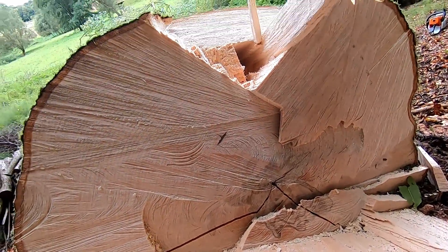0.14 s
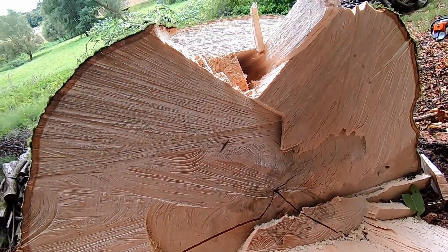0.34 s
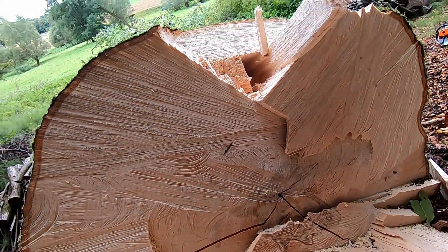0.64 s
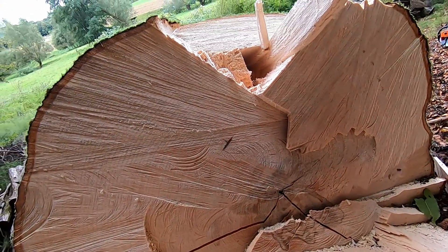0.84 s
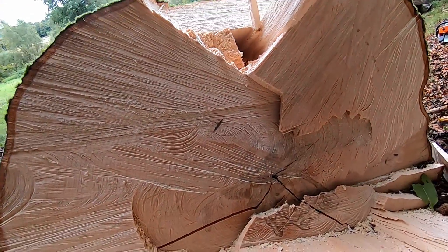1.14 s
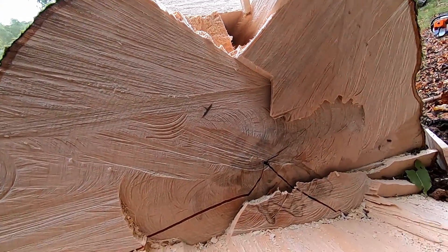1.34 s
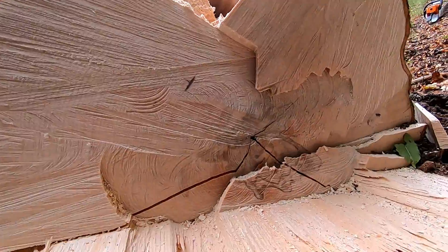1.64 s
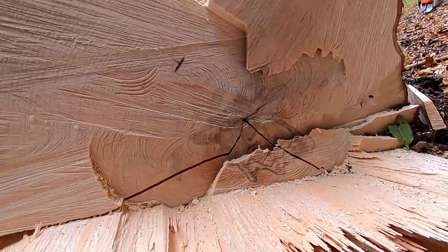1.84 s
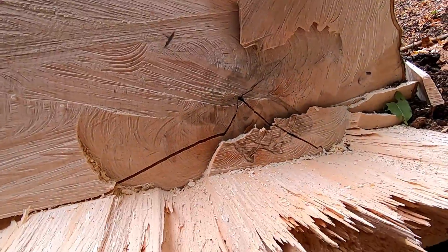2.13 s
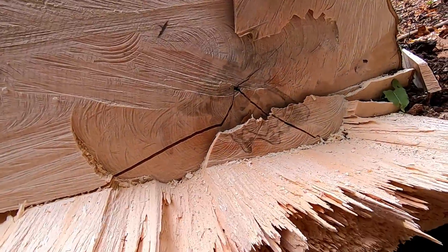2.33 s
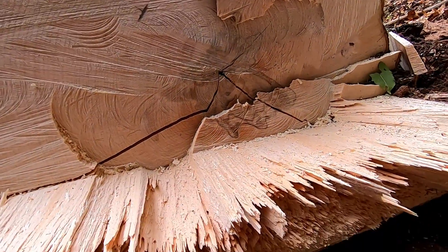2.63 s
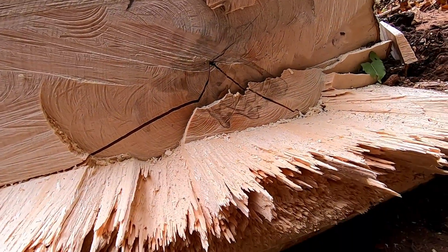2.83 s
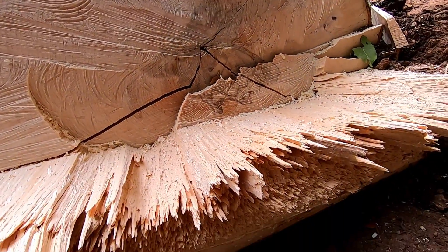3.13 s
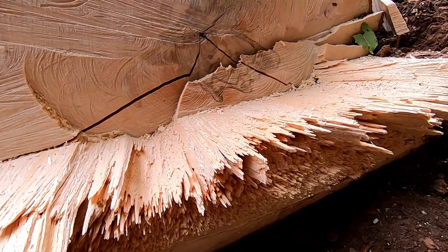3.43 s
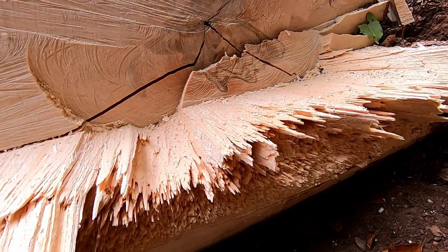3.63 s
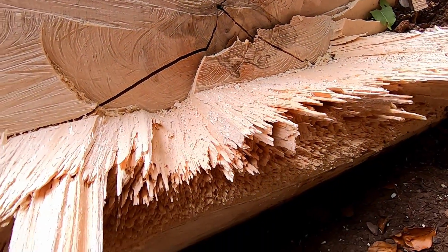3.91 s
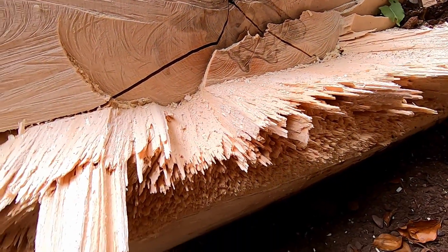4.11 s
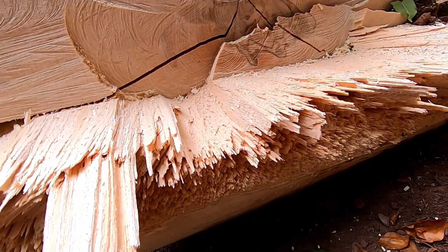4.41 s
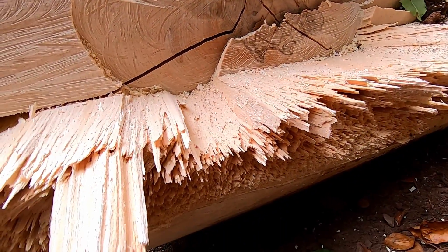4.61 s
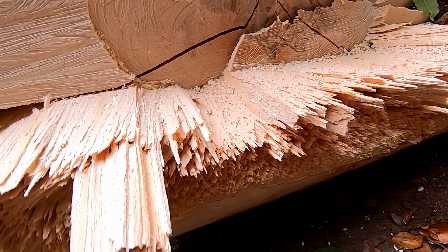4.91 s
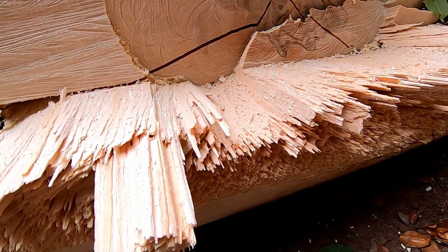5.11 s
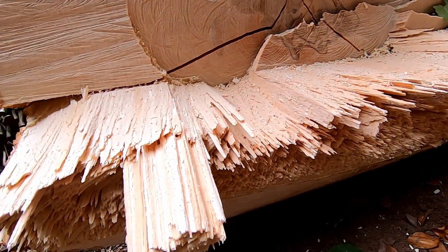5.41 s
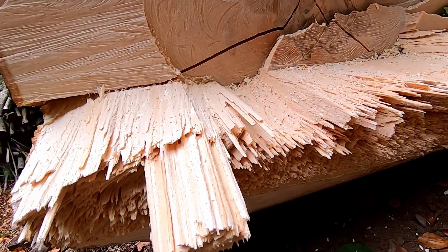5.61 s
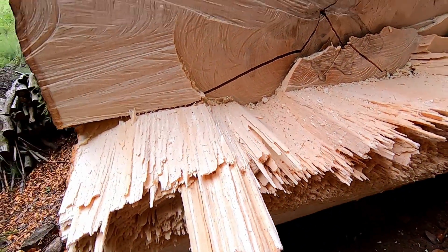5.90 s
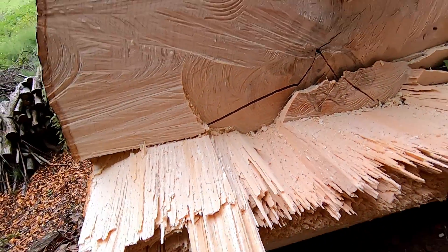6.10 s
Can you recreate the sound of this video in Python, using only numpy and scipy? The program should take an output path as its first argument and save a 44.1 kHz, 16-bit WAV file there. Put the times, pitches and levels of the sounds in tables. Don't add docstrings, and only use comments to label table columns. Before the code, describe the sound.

Five slow, heavy footsteps thump on soft woodland ground beside a felled trunk, each cracking dry litter, over light breeze and faint distant traffic.

```python
import sys
import numpy as np
from scipy import signal
from scipy.fft import rfft, irfft, next_fast_len
from scipy.io import wavfile
from scipy.ndimage import map_coordinates

SR = 44100
rng = np.random.default_rng(int(sys.argv[2]) if len(sys.argv) > 2 else 0)


def how_loud(loudness_db):
    steps = np.asarray(loudness_db, float) / 20
    return 10 ** steps


def materialize(psi):
    bounded = np.clip(np.atleast_2d(psi).T, -1, 1)
    quanta = np.round(bounded * 32767).astype(np.int16)
    wavfile.write(sys.argv[1], SR, quanta)


N = 275660


def on_log(table, hz):
    f, v = np.transpose(table)
    return np.interp(np.log(hz), np.log(f), v)


def stereo(mid, side):
    return np.array([mid + side, mid - side])


def add(out, x, s):
    i = int(s * SR)
    out[:, i:i + x.shape[1]] += x[:, :N - i]


def bands(size, colour, side, pan, gain_db, count=3):
    f = np.arange(size // 2 + 1) * SR / size + 1e-9
    white = rfft(rng.standard_normal((2, size)))
    mid_spec, side_spec = white * how_loud(on_log(colour, f)) * [np.ones(len(f)), how_loud(on_log(side, f))]
    lean = how_loud(np.outer([.5, -.5], on_log(pan, f)))
    unit_rms = size / np.sqrt(2 * np.sum(abs(mid_spec) ** 2))
    spec = stereo(mid_spec, side_spec) * lean * unit_rms
    low_hz, top_hz = colour[0][0], colour[-2][0]
    out = 0
    for octave in np.arange(0, np.log2(top_hz / low_hz) + 1 / count, 1 / count):
        hz = low_hz * 2 ** octave
        window = np.cos(np.pi / 2 * np.clip(count * np.log2(f / hz), -1, 1)) ** 2
        out = out + how_loud(gain_db(hz)) * irfft(spec * window, size)
    return out


def walk(rate, size):
    knots = rng.standard_normal(int(size * rate / SR) + 4)
    return 1.2 * map_coordinates(knots, [np.arange(size) * rate / SR], order=1)


def ring(t, hz, t60, side_db, lead=0.6):
    z = np.exp((2j * np.pi * hz - np.log(1000) / t60) * t)
    return stereo(z.imag, how_loud(side_db) * (z * np.exp(1j * lead)).real)


# [f/Hz, level/dB]
AIR_COLOUR = [(12, -26), (20, -4.5), (66, 0.5), (85, -13.5), (117, -17), (149, -10.5), (170, -16),
              (199, -6.5), (233, -17), (618, -17.5), (894, -19.5), (1400, -18.5), (2640, -24), (7580, -32),
              (10600, -46.5), (11000, -56.5), (14300, -55), (22000, -120)]
# [f/Hz, side level/dB]
AIR_SIDE = [(60, -11.5), (110, -24), (190, -8.5), (340, -10.5), (600, -6.5), (1060, -1.5), (1880, -4),
            (3340, -9), (5930, -4), (10500, 1.5)]
# [f/Hz, left minus right/dB]
AIR_PAN = [(60, -1.5), (110, -1.5), (190, 0.5), (340, -0.5), (600, 1), (1060, 4), (1880, 1), (3340, 1.5),
           (5930, -1), (10500, 2.5)]
# [t/s, level/dB]
LOW_SWELL = [(0.35, -1.5), (0.69, -3.5), (1.04, 4), (1.13, -2.5), (1.95, 0), (2.8, 4.5), (3.83, -4.5), (4.2, 2),
             (6.25, 1)]
# [t/s, level/dB]
TRAFFIC = [(0.35, 3.5), (1.13, 5), (2.3, 2), (3.3, 2), (3.85, 7), (4.2, 3.5), (4.999, -5.5), (6.25, -5)]
AIR_DB = -52.5
UPPER_PER_TRAFFIC = -0.26


def air():
    size = next_fast_len(N)
    t = np.arange(size) / SR
    low_swell_db = np.interp(t, *np.transpose(LOW_SWELL))
    traffic_db = np.interp(t, *np.transpose(TRAFFIC))

    def bump(hz, centre_hz, octaves):
        return np.exp(-(np.log2(hz / centre_hz) / octaves) ** 2)

    def gain_db(hz):
        low, mid, high = bump(hz, 70, 1.77), bump(hz, 600, 1.38), bump(hz, 1500, 1.48)
        swell_db = low * low_swell_db + (mid + UPPER_PER_TRAFFIC * high) * traffic_db
        return swell_db + (.5 + 1.9 * low + 2.7 * mid) * walk(11, size)

    return how_loud(AIR_DB) * bands(size, AIR_COLOUR, AIR_SIDE, AIR_PAN, gain_db, count=2)[:, :N]


# [t/s, low level/dB, mid level/dB, high level/dB, tilt/(dB/octave)]
GRINDS = [
    (0.03, -31.5, -31, -30.5, 3.5),
    (1.466, -29.5, -30.5, -30, 8),
    (2.916, -20.5, -24, -18.5, -4),
    (4.225, -24, -46, -28, -11),
    (5.302, -24, -38.5, -36, 14),
]
# [t/s, level/dB]
SCRAPES = [
    (2.84, -30),
    (2.866, -30),
]
# [low/dB, mid/dB, high/dB, tilt/(dB/octave)]
SOLE_GRIND_DB = (-13, -5.5, -10, 10.5)
# [low/dB, mid/dB, high/dB, tilt/(dB/octave)]
SCRAPE_DB = (-10, 1.5, -15, 26.5)
HEEL_GRIND_MS, SOLE_GRIND_MS, SCRAPE_MS = 27, 13.4, 33.4
SOLE_GRIND_LAG_S = .056


def contacts():
    for s, *heel in GRINDS:
        yield s, *heel, HEEL_GRIND_MS
        yield s + SOLE_GRIND_LAG_S, *np.add(heel, SOLE_GRIND_DB), SOLE_GRIND_MS
    for s, db in SCRAPES:
        yield s, *np.add(SCRAPE_DB[:3], db), SCRAPE_DB[3], SCRAPE_MS


# [f/Hz, level/dB, t60/s, side level/dB]
WOOD = [
    [(248.3, -7, 0.19, -12.5), (316, -2.5, 0.031, -25)],
    [(386.8, -1.5, 0.098, -21)],
    [(533.5, 0, 0.029, -20), (632, -6.5, 0.078, -1.5), (705, -14, 0.087, -6.5), (805, -13, 0.077, 2),
     (947, -17.5, 0.1, -8), (1153, -29, 0.12, -17), (1265, -33.5, 0.13, -10)],
]
SOIL_TOP_HZ = 1150


def grinds(out):
    t = np.arange(SR // 4) / SR
    soil = signal.butter(4, SOIL_TOP_HZ, fs=SR, output="sos")
    for s, *group_dbs, tilt, ms in contacts():
        x = t[:SR // 10] * 1000 / ms
        pressure = (1 - np.exp(-(x / 0.12) ** 2)) * np.exp(-x ** 2.64)
        wood = 0
        for group_db, modes in zip(group_dbs, WOOD):
            for hz, mode_db, t60, side_db in modes:
                force = rng.standard_normal(len(x)) * pressure
                rung = signal.fftconvolve(ring(t, hz, t60, side_db), [force])
                level_db = group_db + mode_db + tilt * max(np.log2(hz / 525), 0)
                wood = wood + how_loud(level_db) * rung / abs(rung).max()
        add(out, how_loud(4.5) * signal.sosfilt(soil, wood), s)


# [t/s, soil level/dB, trunk level/dB, push length/ms, rebound level/dB]
HEELS = [
    (0.034, -12.5, -9.5, 3.37, -16.5),
    (1.472, -11, -18.5, 1.6, -4.5),
    (2.922, -6.5, -9, 2.58, -12),
    (4.231, -11.5, -12, 4.05, 1),
    (5.305, -13.5, -22.5, 2.4, 0),
]
# [lag/s, level/dB, share of rebound/1]
JOLTS = [
    (-.008, -12, 0.2),
    (0, 3.5, 0.26),
    (.010, -1, 1),
    (.015, -12.5, 0.05),
    (.023, -0.5, 0.3),
    (0.034, -15, -.8),
    (.043, -8, 0.2),
    (0.049, -13, 0.7),
    (.085, -14.5, 0),
]
# [f/Hz, level/dB, t60/s, side level/dB]
BODY = [
    [(45, -24, 0.17, -17.5), (78, -2.5, .16, -27), (100, -18.5, 0.069, -35.5)],
    [(137.8, 2.5, 0.082, -30.5), (159.2, 4, 0.12, -23), (176, -7.5, 0.072, -18)],
]
# [f/Hz, level/dB]
RUMBLE = [(15, -39), (25, -2.5), (70, -1.5), (114, 8), (188, 3), (224, -3), (299, -13.5), (379, -0.5),
          (425, -29), (500, -7), (650, -30), (1100, -120)]
# [f/Hz, side level/dB]
RUSTLE_SIDE = [(60, -14), (110, -29.5), (190, -28), (340, -23), (600, -6.5), (1060, -2.5), (1880, -3.5),
               (3340, -10), (5930, -4.5), (10500, 2)]
# [f/Hz, left minus right/dB]
RUSTLE_PAN = [(60, 0), (110, 0), (190, -2.5), (340, 3), (600, 1.5), (1060, 3), (1880, -2), (3340, 0.5),
              (5930, -1), (10500, 3.5)]
SOIL_LOW_HZ = 60
RUMBLE_DB, RUMBLE_T60_S, RUMBLE_LEAD_S = -10.5, 0.46, .004


def heels(out):
    t = np.arange(SR // 2) / SR
    thump_low_cut = signal.butter(2, SOIL_LOW_HZ, "high", fs=SR, output="sos")

    def body(modes):
        rung = sum(how_loud(db) * ring(t, hz, t60, side_db) for hz, db, t60, side_db in modes)
        return signal.sosfilt(thump_low_cut, rung)

    def rumble_db(hz):
        return -60 * t / (RUMBLE_T60_S * (hz / 100) ** -.3)

    soil, trunk = (body(modes) for modes in BODY)
    for s, soil_db, trunk_db, ms, rebound_db in HEELS:
        x = t[:SR // 50] * 1000 / ms
        push = x * np.exp(-2 * x)
        struck = how_loud(soil_db) * soil + how_loud(trunk_db) * trunk
        thud = signal.fftconvolve(struck, [push / push.sum()])
        for lag, jolt_db, share in JOLTS:
            add(out, how_loud(jolt_db + share * rebound_db) * thud, s + lag)
        rumble = bands(len(t), RUMBLE, RUSTLE_SIDE, RUSTLE_PAN, rumble_db)
        onset = 1 - np.exp(-(t / 0.031) ** 2)
        add(out, how_loud(soil_db + RUMBLE_DB) * onset * rumble, s - RUMBLE_LEAD_S)


# [t/s, crack treble level/dB, rustle level/dB, rustle tilt/(dB/octave), twig f/Hz]
SOLES = [
    (0.087, -12.5, -51, -4, 1044),
    (1.525, -4, -39.5, 0, 2890),
    (2.974, -7.5, -40.5, -0.5, 1980),
    (4.284, -4.5, -41.5, 1.5, 2620),
    (5.359, -4, -40.5, 1, 3240),
]
# [f/Hz, level/dB]
CRACK = [(470, -35), (800, 6), (1110, -1), (1250, 6), (1510, -8.5), (1840, -3), (2340, -10), (2980, -6),
         (4050, -15), (5320, -19.5), (6340, -18), (9940, -43), (11000, -53), (14300, -57), (22000, -120)]
# [f/Hz, level/dB]
RUSTLE = [(290, -10), (500, -2.5), (584, -8.5), (623, -1), (727, -2.5), (796, -5), (954, 4), (1600, -6.5),
          (2970, -4), (3850, -4.5), (7840, -11.5), (10000, -23), (11000, -36), (14300, -28), (22000, -120)]
CRACK_DB, CRACK_T60_S, SNAP_DB, SNAP_S = -35, 0.12, -14.5, 0.0019
TWIG_DB, TWIG_T60_S = -36.5, .05
RUSTLE_LAG_S, RUSTLE_RISE_S, RUSTLE_T60_S = .04, .014, 0.76
LITTER_LIFT_DB, LITTER_OCTAVES, LITTER_SAG = 4.5, 0.4, 0.97
LITTER_HOLD = 0.058
GRIT_DB, GRIT_PER_S = 1.45, 900


def soles(out):
    t = np.arange(SR * 4 // 5) / SR
    u = t[:SR // 5]
    snap = 1 + how_loud(SNAP_DB) * np.exp(-u / SNAP_S)
    spray = how_loud(-60 * u / CRACK_T60_S) * snap * np.minimum(u / 0.0019, 1)
    swell = 1 - np.exp(-(np.maximum(t - RUSTLE_LAG_S, 0) / RUSTLE_RISE_S + 0.57))
    for s, treble_db, rustle_level_db, tilt, twig_hz in SOLES:
        def litter_db(hz):
            octaves = np.log2(hz / (twig_hz * LITTER_SAG))
            return LITTER_LIFT_DB * np.exp(-(octaves / LITTER_OCTAVES) ** 2)

        def crack_db(hz):
            return (treble_db + 7.5) * np.clip(np.log2(hz / 1200), 0, 1) + litter_db(hz)

        def rustle_db(hz):
            t60 = RUSTLE_T60_S * (hz / 2500) ** -.3 * (1 + LITTER_HOLD * litter_db(hz))
            return tilt * np.log2(hz / 2500) + litter_db(hz) - 60 * t / t60 + 1.7 * walk(49.4, len(t))

        crack = bands(len(u), CRACK, RUSTLE_SIDE, RUSTLE_PAN, crack_db)
        add(out, how_loud(CRACK_DB + 2.9 * walk(180, len(u))) * spray * crack, s - .001)
        twig = np.minimum(u / 0.00077, 1) * ring(u, twig_hz, TWIG_T60_S, -9)
        add(out, how_loud(TWIG_DB) * twig, s - .001)
        rustle = bands(len(t), RUSTLE, RUSTLE_SIDE, RUSTLE_PAN, rustle_db)
        grit = how_loud(rustle_level_db + GRIT_DB * walk(GRIT_PER_S, len(t)))
        add(out, grit * swell * np.minimum(t / 0.017, 1) * rustle, s)


# [t/s, level/dB, centre f/Hz, t60/s, left minus right/dB]
TICKS = [
    (0.638, -53, 8500, 0.012, 0),
    (1.4545, -41.5, 2870, 0.018, -1.5),
    (2.847, -41, 1450, 0.2, 3),
    (3.947, -45.5, 1300, 0.12, 5),
    (3.996, -54.5, 796, 0.24, 10),
]
TICK_Q, TICK_Q_PER_S = 1, 3.3


def ticks(out):
    t = np.arange(SR // 4) / SR
    for s, db, hz, t60, pan_db in TICKS:
        b, a = signal.iirpeak(hz, TICK_Q + TICK_Q_PER_S * t60, fs=SR)
        mid, side = signal.filtfilt(b, a, rng.standard_normal((2, len(t))))
        lean = how_loud(np.array([[pan_db], [-pan_db]]) / 2)
        burst = stereo(mid / mid.std(), 0.49 * side / side.std()) * lean
        add(out, how_loud(db - 60 * t / t60) * np.minimum(t / (0.09 * t60), 1) * burst, s)


# [t/s, peak level/dB, f/Hz, t60/s]
KNOCKS = [(.72, -48, 354, 0.12), (1.019, -45, 49.3, .11), (2.3, -41.5, 45, .2), (2.564, -44, 62.4, .15),
          (2.652, -42, 56.5, 0.072), (2.842, -41, 65, 0.19), (3.43, -41, 78, .12),
          (4.112, -40.5, 66.6, 0.4), (4.681, -43.5, 73, 0.26), (4.915, -48.5, 557, 0.047),
          (5.039, -53, 575, .049), (5.065, -42, 73, 0.11), (5.152, -45, 78, .7), (5.47, -43.5, 82, 0.41),
          (5.786, -42, 82, 0.1), (6.081, -50, 82, 0.24), (6.142, -48.5, 81, 0.21)]
KNOCK_RISE, KNOCK_SIDE_DB = 0.11, -9.5


def knocks(out):
    t = np.arange(SR // 2) / SR
    for s, db, hz, t60 in KNOCKS:
        onset = 1 - np.exp(-t / (KNOCK_RISE * t60))
        add(out, how_loud(db + 8.5) * onset * ring(t, hz, t60, KNOCK_SIDE_DB), s)


# [t/s, level/dB]
LIFTS = [
    (1.935, -43.5),
    (3.348, -47),
    (4.618, -48.5),
]
# [f/Hz, level/dB, t60/s, rise/s]
LIFT_MODES = [(103, -1, 0.51, 0.033), (148, -4, 0.23, 0.0038), (282, -10, 0.093, .003),
              (380, -13.5, 0.074, 0.0025)]
LIFT_SIDE_DB = 4


def lifts(out):
    t = np.arange(SR // 2) / SR
    lift = 0
    for hz, db, t60, rise_s in LIFT_MODES:
        lift = lift + how_loud(db) * (1 - np.exp(-t / rise_s)) * ring(t, hz, t60, LIFT_SIDE_DB)
    for s, db in LIFTS:
        add(out, how_loud(db + 6.5) * lift, s)


def scene():
    out = air()
    for source in (grinds, heels, soles, ticks, knocks, lifts):
        source(out)
    return out


def band_limit(x):
    return signal.sosfilt(signal.butter(12, 14500, fs=SR, output="sos"), x)


MIC_LOW_HZ, PEAK_CEILING = 23, 0.99


def record(dry):
    rounded = PEAK_CEILING * np.tanh(dry / PEAK_CEILING)
    low_cut = signal.butter(1, MIC_LOW_HZ, "high", fs=SR, output="sos")
    return band_limit(signal.sosfilt(low_cut, rounded))


dry = scene()
out = record(dry)
materialize(out)
```